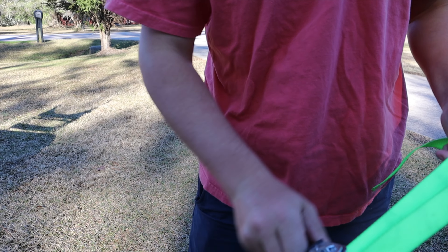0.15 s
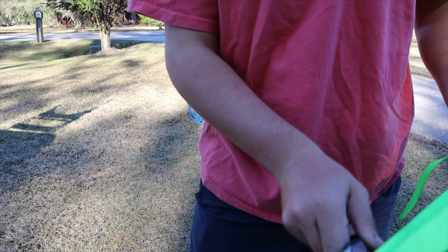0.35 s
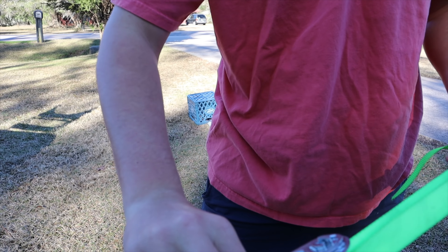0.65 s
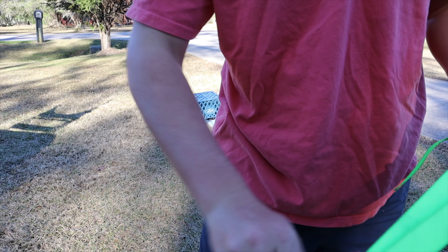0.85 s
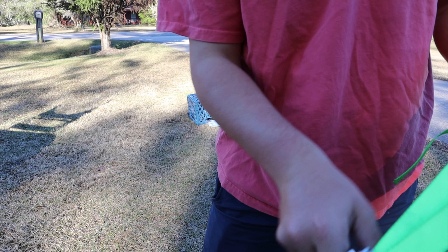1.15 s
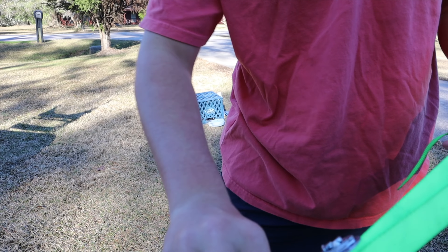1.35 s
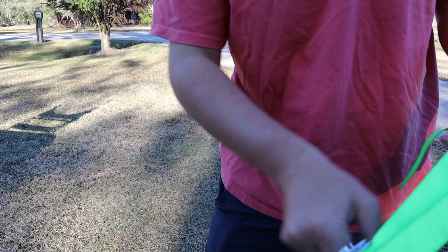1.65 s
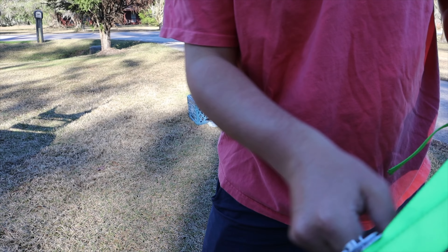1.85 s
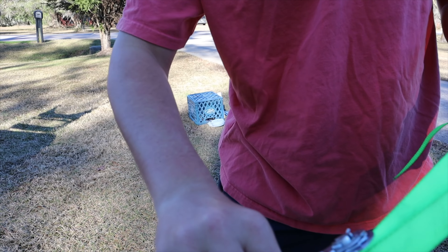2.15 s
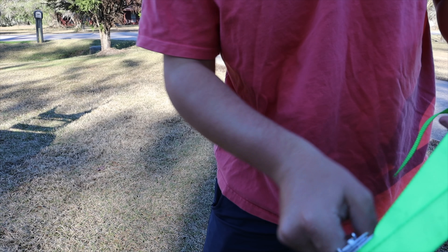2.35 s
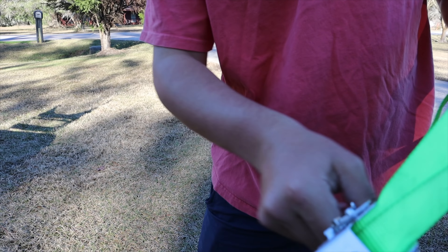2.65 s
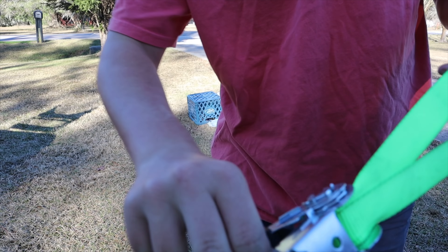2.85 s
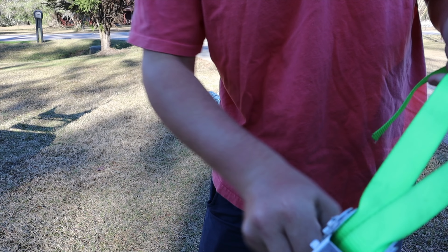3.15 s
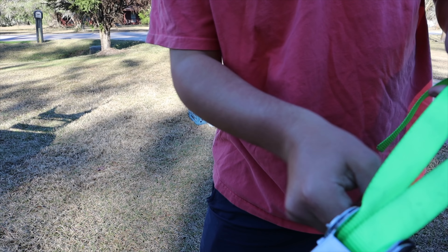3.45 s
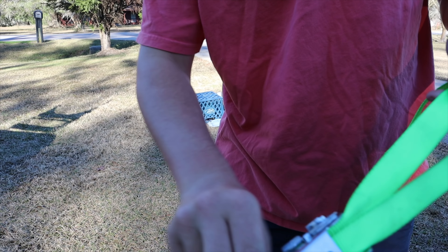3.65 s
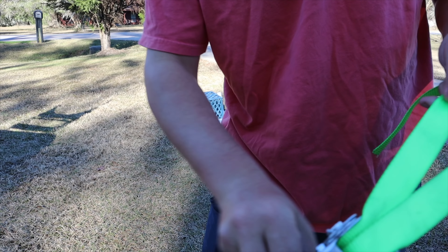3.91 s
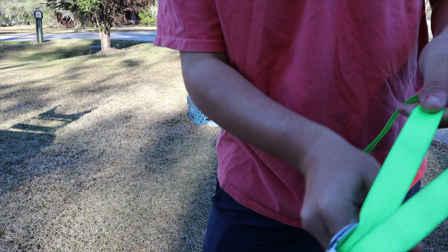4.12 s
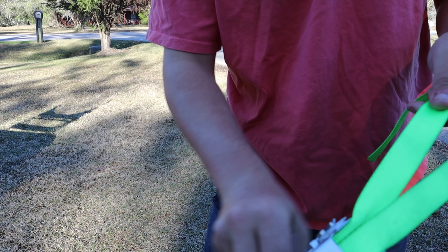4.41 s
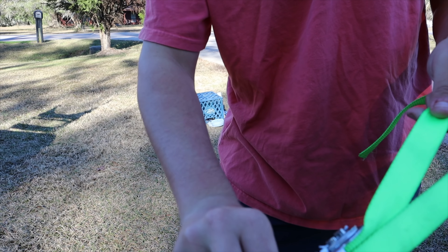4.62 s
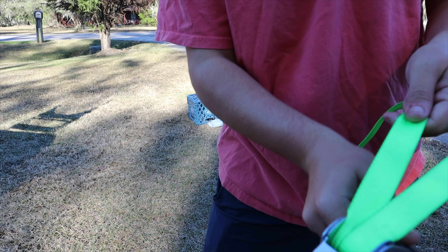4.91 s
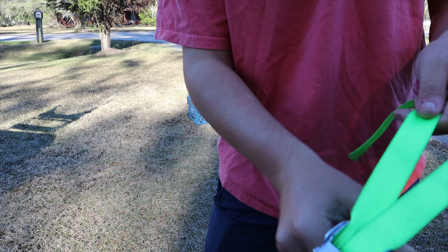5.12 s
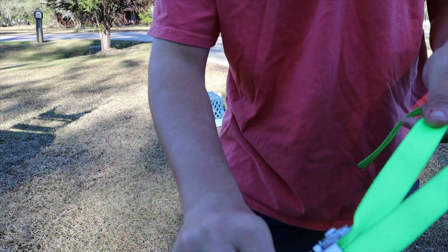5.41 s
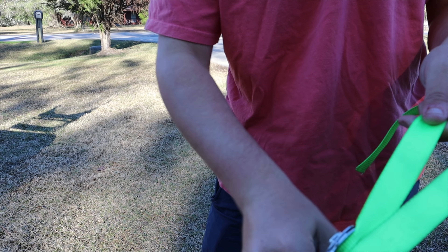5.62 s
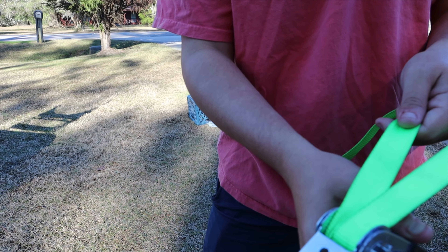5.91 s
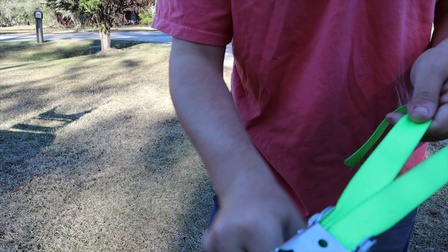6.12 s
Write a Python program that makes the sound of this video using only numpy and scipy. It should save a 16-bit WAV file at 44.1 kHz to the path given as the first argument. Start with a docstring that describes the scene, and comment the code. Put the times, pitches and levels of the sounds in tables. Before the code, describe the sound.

Close, dry sound in a quiet yard, with faint air and webbing hiss throughout. From about 0.1 s a ratchet handle is pulled: rough stick-slip steel grinding, a brief thin squeal, then bright snaps at 0.2 and 0.3 s. The handle swings back with a sparse rattle and two short dry clicks near 0.6 and 0.7 s. The cycle repeats, with pulls at about 0.9, 1.6, 2.4, 3.2, 4.0, 4.8 and 5.7 s and returns between them, the last clicking at 6.2 s. Small metallic ticks scatter around the strokes. Every snap jolts a hollow plastic hull, giving muffled knocks, short boomy ring and grainy creaks. Low rocking rumbles follow harder pulls near 1.8, 2.6, 3.4, 5.1 and 5.9 s, with an especially heavy thump around 5.85 s. A few clicks leave thin steel ringing; the loudest are slightly saturated.

```python
"""Faint outdoor air and webbing hiss open the scene; then a ratchet strap grinds tight over a plastic kayak, close by.
Eight times the handle is pulled and swung back. Stick-slip friction is a train of tiny noise impacts;
the pawl snapping over about two teeth each way is a dense burst of decaying steel modes.
The taut strap carries the jolts into the hollow hull: noise bands and wall modes thump, rumble and creak."""
import sys
import numpy as np
from scipy import signal
from scipy.fft import rfft, irfft, next_fast_len
from scipy.io import wavfile
from scipy.ndimage import uniform_filter1d

SR = 44100
rng = np.random.default_rng(int(sys.argv[2]) if len(sys.argv) > 2 else 0)


def master_out(mix):
    """Clip the mix to full scale and print it as 16-bit PCM to the path in sys.argv[1]."""
    frames = np.transpose(np.atleast_2d(mix))
    ceiling = np.clip(frames, -1, 1)
    pcm = np.round(ceiling * 32767).astype(np.int16)
    wavfile.write(sys.argv[1], SR, pcm)


N = 276507
TIME = np.arange(N) / SR


def from_db(db):
    """Level law: decibels to an amplitude ratio."""
    return 10 ** (np.asarray(db) / 20)


def rms_one(x):
    """Normalisation: scales a signal to an rms of 1."""
    return x / np.sqrt(np.mean(x ** 2) + 1e-20)


def bins(size):
    """Discrete spectrum: the bin frequencies in Hz."""
    return np.fft.rfftfreq(size, 1 / SR)


def at_hz(points, hz):
    """Spectral envelope: interpolates a table on a log-frequency axis."""
    freqs, values = np.transpose(points)
    return np.interp(np.log(hz + 1e-3), np.log(freqs), values)


def resonance_db(peaks, hz):
    """Resonance: sums bell-shaped peaks, in dB over frequency."""
    return sum(db / (1 + ((hz - centre) / width) ** 2) for centre, width, db in peaks)


def treble(hz):
    """Spectral tilt: rises from -1 to 1 across the two octaves in which steel rings."""
    return np.clip(np.log2((hz + 1) / 6000), -1, 1)


def coloured(x, spectrum, peaks=(), tilt_db=0):
    """Linear filtering: gives a steady signal a spectrum, resonances and a treble tilt; rms 1."""
    size = next_fast_len(len(x))
    hz = bins(size)
    gain_db = at_hz(spectrum, hz) + resonance_db(peaks, hz) + tilt_db * treble(hz)
    return rms_one(irfft(rfft(x, size) * from_db(gain_db), size)[:len(x)])


def dense_modes(level_db):
    """Modal overlap: many close modes with the given levels and random phases; rms 1."""
    phases = np.exp(2j * np.pi * rng.random(len(level_db)))
    return rms_one(irfft(from_db(level_db) * phases))


def fade(t60, size):
    """Exponential damping: falls by 60 dB in t60 seconds."""
    return from_db(-60 * TIME[:size] / max(t60, 1e-3))


def mode(hz, t60, size=32768):
    """Modal vibration: a damped sine whose envelope starts at 1."""
    return np.sin(2 * np.pi * hz * TIME[:size]) * fade(t60, size)


def add(out, s, sound):
    """Superposition: mixes a sound in at a time."""
    start = max(round(s * SR), 0)
    out[start:start + len(sound)] += sound[:N - start]


def gesture(start, end, attack_s, release_s, swell_db=0):
    """Amplitude envelope of one movement: it rises, holds while swelling, and dies away."""
    t = TIME - start
    held = from_db(swell_db * (np.clip(t / (end - start), 0, 1) - .5))
    release = np.exp(-np.clip((TIME - end) / release_s, 0, 20))
    return np.clip(t / attack_s, 0, 1) * held * release


# how long the hand-damped frame rings after one tiny slip
SLIP_T60_S = .013


def slips(per_s, unevenness, spread_db, grain_t60, hiss_db):
    """Stick and slip: a loose train of tiny impacts that come in runs, over faint smooth friction; level evened."""
    gaps = np.exp(unevenness * rng.standard_normal(6000))
    # about one slip in five is followed by a longer stick
    gaps *= np.where(rng.random(len(gaps)) < .2, 3.5, 1)
    at = (np.cumsum(gaps) / gaps.mean() * SR / per_s).astype(int)
    sizes = from_db(spread_db * np.clip(rng.standard_normal(len(at)), -2, 2))
    impacts = np.bincount(at[at < N], sizes[at < N] ** 2, N)
    # power decays here; -120 through the amplitude law is -60 dB of power
    power = signal.lfilter([1], [1, -from_db(-120 / (grain_t60 * SR))], impacts + 1e-12)
    power = power + from_db(hiss_db) ** 2 * power.mean()
    return rng.standard_normal(N) * np.sqrt(power / uniform_filter1d(power, size=1700))


# outdoor air spectrum: frequency_hz, level_db (per Hz)
AIR_SPECTRUM = [(18, -36.5), (30, 3), (106, 7), (189, 5.5), (1500, -0.5), (4780, -39.5), (5740, -29.5),
                (8520, -22), (13300, -25), (16000, -31.5)]


def air(level_db):
    """Stationary random noise: quiet outdoor air with a fixed spectrum."""
    return from_db(level_db) * coloured(rng.standard_normal(N), AIR_SPECTRUM)


# low rumble of the rocking boat: frequency_hz, level_db (per Hz)
ROCKING_SPECTRUM = [(15, -26.5), (27, -8), (38, -5), (46, -9.5), (68, -22.5), (130, -26.5), (300, -74)]
# slight sway all along, interpolated: time_s, level_db
SWAY = [(0, -66.5), (.6, -55.5), (1.2, -61.5), (1.9, -51.5), (2.2, -57.5), (3.1, -59), (3.9, -56),
        (4.5, -51), (5.5, -58.5), (6.27, -53.5)]
# the boat rocks after a hard pull: start_s, end_s, level_db
ROCKS = [(1.812, 1.894, -41.5), (2.57, 2.78, -38), (3.397, 3.514, -41.5), (5.06, 5.15, -44.5),
         (5.858, 5.965, -36.5)]
ROCK_ATTACK_S, ROCK_RELEASE_S = 0.022, 0.051


def rocking():
    """Low-frequency rigid-body motion: the boat sways under the strap and rumbles after the hard pulls."""
    level = from_db(np.interp(TIME, *np.transpose(SWAY)))
    for start, end, level_db in ROCKS:
        rock = from_db(level_db) * gesture(start, end, ROCK_ATTACK_S, ROCK_RELEASE_S)
        level = np.maximum(level, rock)
    return level * coloured(rng.standard_normal(N), ROCKING_SPECTRUM)


# the handle is pulled, halting now and then: start_s, end_s, grinding_db, treble_tilt_db
PULLS = [(0.063, 0.111, -37, -2.5), (0.142, 0.314, -34.5, 3), (0.882, 0.91, -32, -0.5),
         (0.914, 0.985, -33.5, 1), (1.001, 1.069, -34.5, 0.5), (1.574, 1.621, -33.5, -2),
         (1.639, 1.775, -32, 1.5), (2.33, 2.428, -30, 4), (2.463, 2.494, -36, 1), (3.181, 3.301, -37, 3),
         (3.32, 3.394, -42.5, 0), (3.942, 3.989, -30.5, -3), (4.086, 4.224, -42, 0),
         (4.768, 4.801, -32, 0.5), (4.804, 4.95, -41.5, 2.5), (4.957, 4.994, -26.5, 3),
         (5.632, 5.652, -29, 0), (5.743, 5.886, -34, 2.5)]
PULL_ATTACK_S, PULL_RELEASE_S, PULL_SWELL_DB = 0.0089, 0.01, 2
# the slack handle swings back: start_s, end_s, rattle_db
RETURNS = [(0.452, 0.595, -40.5), (0.642, 0.695, -41.5), (1.237, 1.364, -36), (1.931, 2.065, -36),
           (2.72, 2.844, -41), (2.858, 2.893, -43.5), (3.59, 3.75, -39), (4.409, 4.543, -35),
           (5.248, 5.398, -39.5), (6.104, 6.146, -37.5), (6.156, 6.258, -40)]
RETURN_ATTACK_S, RETURN_RELEASE_S, RETURN_SWELL_DB = 0.02, 0.01, 4.5
# the webbing brushes lightly: start_s, end_s, level_db
BRUSHES = [(1.487, 1.53, -62.5), (1.796, 1.889, -60), (2.221, 2.29, -62.5), (2.284, 2.348, -44.5),
           (2.495, 2.6, -59), (2.9, 2.996, -64), (3.065, 3.11, -63), (3.109, 3.188, -47.5),
           (3.544, 3.6, -54.5), (4.02, 4.08, -56.5), (4.345, 4.42, -60), (4.593, 4.633, -55.5),
           (5.57, 5.726, -61)]
BRUSH_ATTACK_S, BRUSH_RELEASE_S = 0.03, .012
IDLE_RUB_DB = -66.5  # steady light contact


def rubbing():
    """Friction drive: how hard spool, cheeks and webbing rub, as gains for pulls, returns and light contact."""
    pull = sum(from_db(db) * gesture(start, end, PULL_ATTACK_S, PULL_RELEASE_S, PULL_SWELL_DB)
               for start, end, db, _ in PULLS)
    back = sum(from_db(db) * gesture(start, end, RETURN_ATTACK_S, RETURN_RELEASE_S, RETURN_SWELL_DB)
               for start, end, db in RETURNS)
    brush = sum(from_db(db) * gesture(start, end, BRUSH_ATTACK_S, BRUSH_RELEASE_S)
                for start, end, db in BRUSHES)
    return pull, back, brush + from_db(IDLE_RUB_DB)


def bunching(depth_db, per_s):
    """Amplitude modulation: friction bunches into rough, uneven runs, a quick random swing of the gain."""
    knots = np.clip(rng.standard_normal(2000), -1.5, 1.5)
    return rms_one(from_db(depth_db * np.interp(TIME * per_s, np.arange(len(knots)), knots)))


# broad spectrum of the slack handle's rattle: frequency_hz, level_db (per Hz)
RETURN_RUB_SPECTRUM = [(590, -54.5), (1000, -12), (1850, -8), (2390, 0), (4210, -2), (4730, -0.5),
                       (7350, -9), (8960, -10.5), (10200, -19), (13600, -19), (16000, -31)]


def rattle(tilt_db):
    """Intermittent contact: the slack handle ticks sparsely at two places, one duller and one brighter."""
    places = []
    for sign in (-1, 1):
        touches = slips(per_s=65, unevenness=.65, spread_db=4.5, grain_t60=SLIP_T60_S, hiss_db=-13)
        places.append(coloured(touches, RETURN_RUB_SPECTRUM, tilt_db=sign * tilt_db))
    return rms_one(sum(places))


# broad spectrum of the grinding on the pull: frequency_hz, level_db (per Hz)
PULL_RUB_SPECTRUM = [(500, -35), (1200, -13.5), (1900, -13.5), (3100, -1.5), (3900, -4.5), (6300, -7.5),
                     (8000, -7), (10000, -15), (12300, -13), (14500, -17), (16000, -23.5)]
# resonances of the loaded frame: centre_hz, width_hz, height_db
FRAME_PEAKS = [(3250, 300, 4), (4800, 300, 8), (8850, 260, 6), (11350, 260, 8), (13300, 400, 6)]


def friction(pull, back, brush, pull_db, return_db, hiss_db, loose_db):
    """Dry friction: loaded steel grinds, the slack handle rattles, light contact hisses and ticks faintly."""
    grind = slips(per_s=180, unevenness=.45, spread_db=4, grain_t60=SLIP_T60_S, hiss_db=-20)
    steel = np.zeros(N)
    for start, end, _, tilt_db in PULLS:
        stroke = (TIME >= start) & (TIME < end + 10 * PULL_RELEASE_S)
        steel[stroke] = coloured(grind[stroke], PULL_RUB_SPECTRUM, FRAME_PEAKS, tilt_db)
    metal = from_db(pull_db) * pull * steel
    metal += from_db(return_db) * back * rattle(tilt_db=3.5)
    hiss = coloured(rng.standard_normal(N), [(600, -20.5), (2400, -2.5), (5000, -6.5), (16000, -13.0)])
    light = from_db(hiss_db) * hiss + from_db(loose_db) * rattle(tilt_db=7)
    return metal * bunching(depth_db=3.0, per_s=88) + brush * light


# the boat shifts on its bed: time_s, knock_centre_hz, level_db
BUMPS = [(1.774, 480, -28), (2.556, 224.7, -26.5), (2.593, 160, -35), (3.212, 300, -33),
         (3.818, 166, -42.5), (5.847, 490, -20), (5.876, 162, -20)]
DULL_KNOCK_HZ = 203  # slack jolts and light ticks knock dully, favouring wall modes near this pitch
RETURN_JOLT_DB = -40
TICK_JOLT_DB = -19.5  # relative to the tick


def thumps():
    """Force transmission: snaps, ticks and shifts jolt the hull; rows of time_s, knock_centre_hz, level_db."""
    taut = [(s, hz, db) for s, *_, hz, db in PULL_TEETH] + list(BUMPS)
    slack = [(s, DULL_KNOCK_HZ, RETURN_JOLT_DB) for s, *_ in RETURN_TEETH]
    light = [(s, DULL_KNOCK_HZ, db + TICK_JOLT_DB) for s, db, _, _ in TICKS]
    return taut + slack + light


# broad spectrum of the hull: frequency_hz, level_db (per Hz)
HULL_SPECTRUM = [(45, -32.5), (70, -10.5), (130, -6.5), (200, 0), (300, -0.5), (450, 0.5), (580, -3.5),
                 (740, -8), (1200, -8.5), (1700, -16.5), (2600, -24.5), (4000, -52)]
# resonances of the hull: centre_hz, width_hz, height_db
HULL_PEAKS = [(96, 7, 4), (177, 2.3, 6), (480, 22, -2.5), (625, 18, 2.5), (823.4, 31, 8.5), (1068, 14, 4)]
# ring of the hull in each band: centre_hz, t60_s
HULL_DECAY = [(90, 0.43), (175, 0.68), (300, 0.42), (600, 0.33), (1200, 0.071), (2500, 0.18)]


def hull(rub, gain_db, ring_db, knock_t60, rub_db, rise_s, size=32768):
    """Energy decay: each jolt gives a short plastic knock and a longer hollow ring; friction murmurs through."""
    energy = np.zeros(N)
    for s, _, level_db in thumps():
        energy[round(s * SR)] += from_db(level_db + gain_db) ** 2
    energy += (from_db(rub_db) * rub) ** 2 / SR
    rise = 1 - np.exp(-TIME[:size] / rise_s)
    padded = next_fast_len(N)
    wall = rfft(coloured(rng.standard_normal(N), HULL_SPECTRUM, HULL_PEAKS), padded)
    centres = np.array(HULL_DECAY)[:, 0]
    out = np.zeros(N)
    # overlapping bands whose gains sum to one
    for (_, t60), share in zip(HULL_DECAY, np.eye(len(HULL_DECAY))):
        crossover = np.column_stack([centres, share])
        band = irfft(wall * at_hz(crossover, bins(padded)), padded)[:N]
        decay = rise * (fade(knock_t60, size) + from_db(ring_db) * fade(t60, size))
        power = np.abs(signal.oaconvolve(energy, decay ** 2)[:N])
        out += band * np.sqrt(power)
    return out


def pawl(clicks, colour, gain_db, peak_db, peak_width_hz, tail_db, tail_t60, slide_db, slide_s, size=6144):
    """Impact excitation: a sliding pawl slams home; the hand damps the frame within milliseconds."""
    out, hz = np.zeros(N), bins(size)
    steel = at_hz(colour, hz)
    ringing = steel + resonance_db(FRAME_PEAKS, hz)
    for s, level_db, t60, tilt_db, ring_hz in clicks:
        frame = steel + tilt_db * treble(hz) + resonance_db([(ring_hz, peak_width_hz, peak_db)], hz)
        snap = dense_modes(frame) * fade(t60, size)
        # equal energy for every snap: that of rms 1 over 3 ms
        snap = snap / np.sqrt(np.sum(snap ** 2) / (.003 * SR))
        tail = from_db(tail_db) * dense_modes(ringing) * fade(tail_t60, size)
        add(out, s, from_db(level_db + gain_db) * (snap + tail))
        # a duller scrape swells just before the tooth lets go
        swell = np.linspace(0, 1, max(int(slide_s * SR), 2))
        scrape = dense_modes(frame - 5 * treble(hz))[:len(swell)]
        add(out, s - slide_s, from_db(level_db + slide_db) * swell * scrape)
    return out


# play in the handle is taken up: time_s, level_db, treble_tilt_db, strongest_resonance_hz
TICKS = [(0.1035, -23.5, -6.5, 6650), (0.1303, -34, -7.5, 2300), (0.3043, -24.5, -2, 3210),
         (0.6091, -34, -8, 4100), (0.8697, -39.5, -5.5, 3170), (0.881, -36.5, -7, 3290),
         (0.9406, -23, 2, 4930), (0.9647, -21, 1, 3470), (1.0353, -24, 5.5, 8310), (1.2016, -48, -4, 3100),
         (1.232, -28.5, 1, 5150), (1.2905, -31.5, -17.5, 2480), (1.56, -32.5, -3, 3770),
         (1.5972, -25.5, -3, 7920), (1.6103, -18, 1, 3750), (1.6935, -19.5, 5, 8660),
         (1.7427, -20.5, -3.5, 11480), (1.9232, -31.5, 0, 4700), (1.9619, -29.5, -6, 2340),
         (2.3451, -15, -1, 3830), (2.396, -22, 11.5, 4950), (2.4777, -27, -6, 5100),
         (2.697, -33, -3.5, 2930), (2.7556, -25, -3, 9000), (2.8334, -27.5, -8.5, 3630),
         (3.1106, -35.5, -4.5, 3250), (3.162, -24.5, -2.5, 4700), (3.2362, -30, 3, 4740),
         (3.2715, -16, 1, 7880), (3.377, -20, 2, 8680), (3.6451, -20.5, -5, 2290),
         (3.7221, -18.5, -0.5, 2600), (4.002, -32.5, -4, 3300), (4.1223, -21.5, 3, 9350),
         (4.1957, -18.5, 3.5, 9020), (4.3895, -34, -0.5, 8000), (4.4311, -24.5, 0.5, 3080),
         (4.7511, -34.5, -3, 3680), (4.7816, -27, -3, 8050), (4.9048, -18, 0, 9370),
         (5.2316, -36, -5, 4740), (5.2742, -33, -3.5, 4820), (5.2999, -25, -10, 4650),
         (5.6178, -31.5, -11.5, 3270), (5.651, -18, 0, 3530), (5.759, -27, 2, 11350),
         (5.7932, -22.5, 1, 9040), (5.9072, -24.5, -1, 4910), (6.0798, -28.5, 5.5, 4890),
         (6.1197, -25, 5.5, 4670), (6.165, -21, -2.5, 6860), (6.2011, -27, -2, 3290)]
TICK_T60_S = .02
# steel frame under load: frequency_hz, level_db
PULL_COLOUR = [(200, -38), (1000, -13), (1800, -16), (3000, -3.5), (4000, -7.5), (4850, 0.5), (5700, -6.5),
               (7400, -3), (9000, -3), (9700, -9), (11000, -7), (14000, -8.5), (15800, -16)]


def ticks():
    """Light impact: small contacts excite the same frame as the loaded pawl."""
    clicks = [(s, db, TICK_T60_S, tilt, hz) for s, db, tilt, hz in TICKS]
    return pawl(clicks, PULL_COLOUR, gain_db=0, peak_db=10.5, peak_width_hz=190,
                tail_db=-23, tail_t60=0.13, slide_db=-14, slide_s=0.002)


# wall modes of the hull: frequency_hz, level_db
WALL_MODES = [(166, -9.5), (204, -10), (280, -12), (405, -7), (478, -6.5), (550, -10), (632, -12.5),
              (830, -14), (1068, -16)]


def wall_knocks(gain_db, cycles, rise_s, spread_db, centre_db, centre_width_hz):
    """Modal excitation: each jolt rings all wall modes for some dozens of cycles, favouring those near its centre."""
    out = np.zeros(N)
    mode_hz = np.array(WALL_MODES)[:, 0]
    knocks = np.array([from_db(db) * mode(hz, cycles / hz) for hz, db in WALL_MODES])
    knocks *= 1 - np.exp(-TIME[:knocks.shape[1]] / rise_s)
    for s, hz, level_db in thumps():
        favour_db = resonance_db([(hz, centre_width_hz, centre_db)], mode_hz)
        favour_db = favour_db + spread_db * rng.uniform(-1, 1, len(knocks))
        signs = rng.choice([-1, 1], len(knocks))
        add(out, s, (from_db(level_db + gain_db + favour_db) * signs) @ knocks)
    return out


# stick and slip locks onto two frame modes: start_s, end_s, lower_mode_db, upper_mode_hz, upper_mode_db
SQUEALS = [(0.151, 0.192, -34.5, 11100, -33.5), (0.919, 1.03, -43, 11160, -37.5),
           (1.649, 1.7, -51.5, 11370, -38.5), (2.355, 2.49, -46, 8700, -52), (3.194, 3.363, -44, 8700, -57),
           (4.072, 4.194, -43.5, 8950, -46.5), (6.07, 6.145, -40, 8850, -46)]
LOWER_SQUEAL_HZ = 4820


def squeals(relative_width, per_s):
    """Friction-driven resonance: a rough train of slips pumps two narrow modes of the frame."""
    out = np.zeros(N)
    drive = slips(per_s, unevenness=.3, spread_db=3, grain_t60=SLIP_T60_S, hiss_db=-15)
    for start, end, lower_db, upper_hz, upper_db in SQUEALS:
        train = drive[round(start * SR):round(end * SR)]
        for hz, level_db in ((LOWER_SQUEAL_HZ, lower_db), (upper_hz, upper_db)):
            edges_hz = [hz * (1 - relative_width / 2), hz * (1 + relative_width / 2)]
            tone = signal.sosfilt(signal.butter(2, edges_hz, "band", fs=SR, output="sos"), train)
            tone = rms_one(tone * signal.windows.tukey(len(tone), .3))
            add(out, start, from_db(level_db) * tone)
    return out


# the holding pawl drops over a tooth on the pull: time_s, level_db, treble_tilt_db, strongest_resonance_hz,
# first_touch_ahead_s, first_touch_relative_db, hull_knock_centre_hz, hull_jolt_db
PULL_TEETH = [(0.2156, -8, 5, 10900, 0.00068, 0, 465, -28), (0.2963, -16, 1.5, 10870, .0005, -7, 205, -35),
              (0.9746, -9.5, 5, 10400, 0.0012, -1.5, 203, -27.5),
              (1.0573, -12, -2, 4370, 0.0024, -2.5, 516, -29.5),
              (1.7115, -7, 0.3, 4900, 0.0026, -10.5, 212, -28),
              (1.7665, -7.5, 2, 3450, .0005, -15, 166, -27),
              (2.4044, -6, 0.8, 4830, .0005, -7.5, 468, -24.5),
              (2.4935, -12, -2.5, 4660, 0.0033, 2.5, 472, -25),
              (3.285, -12.5, -2, 4640, 0.0056, 0.5, 406, -31),
              (3.3876, -10.5, 1, 2890, 0.00051, -18, 204, -30),
              (4.0285, -8.5, -3, 8240, 0.0072, -10.5, 409, -30),
              (4.1392, -4, 1, 9150, 0.0026, -7.5, 460, -27.5),
              (4.2111, -13.5, -0.5, 7300, .0014, 1.5, 380, -27.5),
              (4.9204, -3, 3, 9160, .0005, -8.5, 475, -25.5),
              (4.9943, -10.5, -0.5, 8830, 0.0026, -3.5, 465, -29),
              (5.8108, -7, -1.5, 9070, .0005, -8, 555, -30)]
TOOTH_T60_S, FIRST_TOUCH_TILT_DB = 0.014, 4.5


def pull_snaps():
    """Double impact: under load the pawl strikes a brighter, mostly lighter first touch, then home."""
    clicks = []
    for s, db, tilt, hz, ahead_s, touch_db, _, _ in PULL_TEETH:
        clicks.append((s - ahead_s, db + touch_db, TOOTH_T60_S, tilt + FIRST_TOUCH_TILT_DB, hz))
        clicks.append((s, db, TOOTH_T60_S, tilt, hz))
    return pawl(clicks, PULL_COLOUR, gain_db=-0.5, peak_db=9.5, peak_width_hz=250,
                tail_db=-28, tail_t60=0.097, slide_db=-13, slide_s=0.003)


# taut webbing creaking on the deck: frequency_hz, level_db (per Hz)
CREAK_SPECTRUM = [(200, -25.5), (330, -1.5), (480, 3.5), (700, -8), (1100, -3.5), (1600, -15.5),
                  (3000, -35)]


def creak(gain_db, rise_s, hold_s, release_s):
    """Stick-slip creep: after each tooth gained, the webbing creeps over the deck in a grainy creak."""
    level = np.zeros(N)
    shape = gesture(0, hold_s, rise_s, release_s)[:SR]
    for s, *_, jolt_db in PULL_TEETH:
        add(level, s, from_db(jolt_db + gain_db) * shape)
    grains = slips(per_s=150, unevenness=.5, spread_db=2.5, grain_t60=0.026, hiss_db=-10)
    return level * coloured(grains, CREAK_SPECTRUM, HULL_PEAKS)


# the handle's pawl drops over a tooth on the way back:
# time_s, level_db, t60_s, treble_tilt_db, strongest_resonance_hz
RETURN_TEETH = [(0.5761, -12.5, 0.0085, 5.5, 3820), (0.6789, -12.5, 0.011, -2, 11300),
                (1.3203, -7, 0.014, 2.5, 5600), (1.3596, -7.5, 0.0087, 6, 4470),
                (2.021, -8.5, .012, 1, 6380), (2.0643, -11, 0.012, 0, 3630),
                (2.8192, -9, 0.0057, 0.5, 5560), (2.8803, -10, 0.0082, 0.5, 4660),
                (3.6725, -6.5, 0.011, -2, 4960), (3.7304, -9, 0.007, 0.5, 4830),
                (4.4849, -10, .011, -1.5, 5350), (4.5385, -9.5, .01, -2, 3580),
                (5.3378, -8.5, 0.018, 0.5, 4730), (5.3817, -11.5, .015, 0, 4670),
                (6.2228, -7, 0.015, 0.5, 6100)]
# slack steel handle: frequency_hz, level_db
RETURN_COLOUR = [(200, -30.5), (1000, -17), (1900, -11.5), (2500, -6), (3300, -3), (4800, -4), (6000, -4.5),
                 (8300, -3.5), (10800, -11.5), (12600, -6), (15800, -15)]


def return_snaps():
    """Single damped impact: the slack pawl strikes once, short and dry."""
    return pawl(RETURN_TEETH, RETURN_COLOUR, gain_db=1.5, peak_db=11, peak_width_hz=330,
                tail_db=-21.5, tail_t60=0.056, slide_db=-10.5, slide_s=0.0058)


# now and then a click leaves the handle ringing: start_s, pitch_hz, peak_db, t60_s
AFTER_RINGS = [(.68, 3005, -50.5, 0.28), (1.059, 1980, -51, 0.36), (1.058, 2287, -59.5, 0.64),
               (1.058, 2800, -54, 0.27), (1.058, 12500, -59.5, .14), (1.058, 11340, -46, 0.14),
               (2.88, 2320, -63.5, 0.97), (4.539, 2825, -53.5, .3), (5.652, 11261, -49.5, 0.22)]


def steel_ring():
    """Free vibration: thin tones hang on where the hand does not damp the handle."""
    out = np.zeros(N)
    for s, hz, level_db, t60 in AFTER_RINGS:
        add(out, s, from_db(level_db) * mode(hz, t60))
    return out


# reflections off the boat and the truck: delay_s, level_db
ECHOES = [(.0056, -22.5), (.0098, -29), (0.0128, -25.5)]


def yard(x, scatter_db, t60, size=22050):
    """Reflection and scattering: a few near echoes and a faint, dull scatter from the trees."""
    spectrum = at_hz([(300, 10.5), (2500, -7.5), (6000, -15.5), (16000, -9.0)], bins(size))
    response = dense_modes(spectrum) * fade(t60, size)
    response *= from_db(scatter_db) / np.sqrt(np.sum(response ** 2))
    for delay, level_db in ECHOES:
        response[round(delay * SR)] += from_db(level_db)
    return x + signal.oaconvolve(x, response)[:N]


def scene():
    """Superposition of sources: the ratchet in the yard, the boat beneath it and quiet outdoor air."""
    pull, back, brush = rubbing()
    scrape = friction(pull, back, brush, pull_db=-1.5, return_db=-1.5, hiss_db=-4.5, loose_db=-4)
    scrape += squeals(relative_width=0.11, per_s=200)
    ratchet = scrape + ticks() + pull_snaps() + return_snaps() + steel_ring()
    boat = hull(pull + back + brush, gain_db=-3.5, ring_db=-4.5, knock_t60=0.073, rub_db=6, rise_s=0.0021)
    boat += wall_knocks(gain_db=-3.5, cycles=42, rise_s=.003, spread_db=3.5, centre_db=12.5, centre_width_hz=21)
    boat += creak(gain_db=-9.5, rise_s=.008, hold_s=0.017, release_s=0.028)
    boat += rocking()
    return (yard(ratchet, scatter_db=-43.5, t60=.45) + boat + air(level_db=-65))[None]


CUTOFF_HZ = 15900


def record(dry):
    """Saturation and band limiting: the hardest snaps overload the microphone; the top is cut."""
    overloaded = np.tanh(dry)
    return signal.sosfilt(signal.ellip(10, .2, 70, CUTOFF_HZ, fs=SR, output="sos"), overloaded)


dry = scene()
out = record(dry)
master_out(out)
```